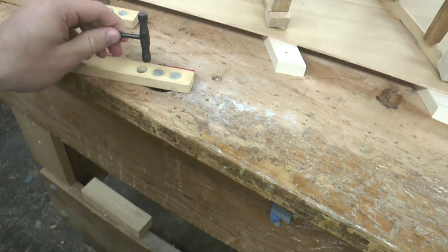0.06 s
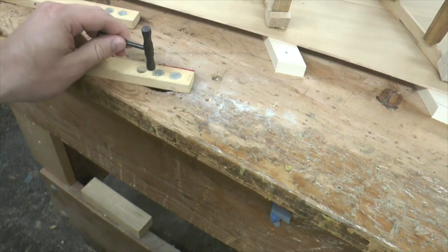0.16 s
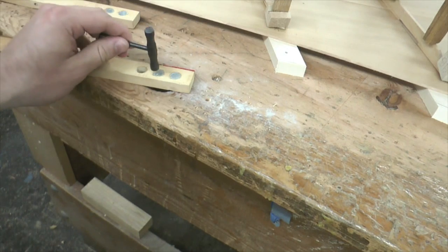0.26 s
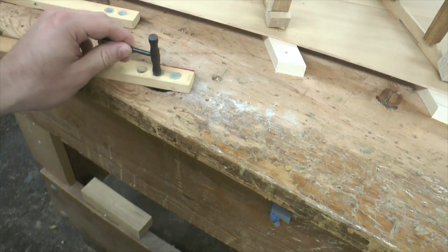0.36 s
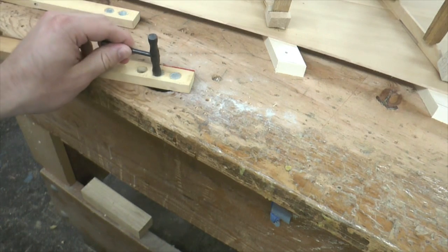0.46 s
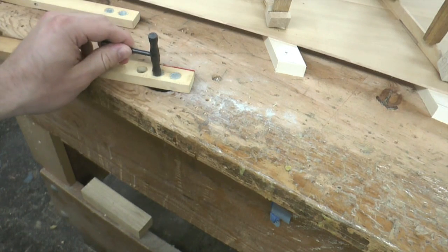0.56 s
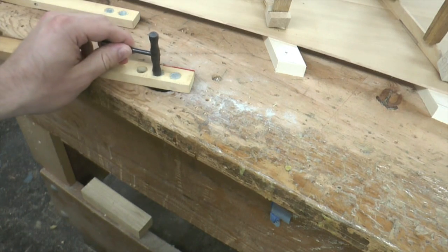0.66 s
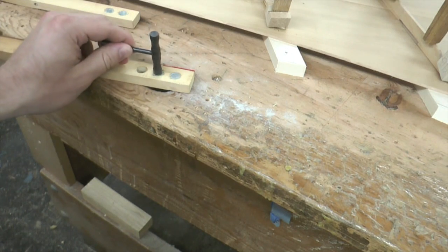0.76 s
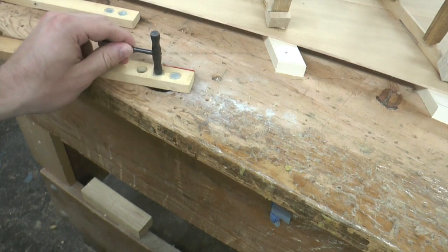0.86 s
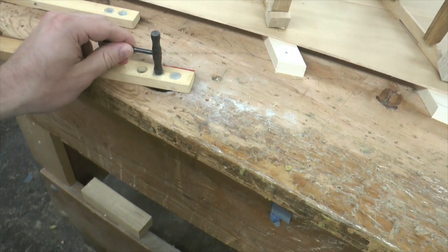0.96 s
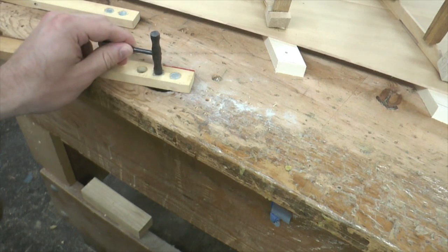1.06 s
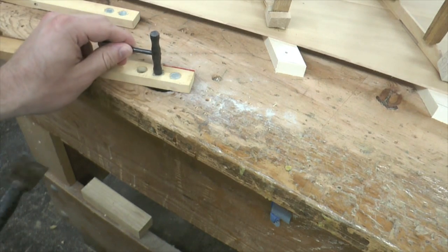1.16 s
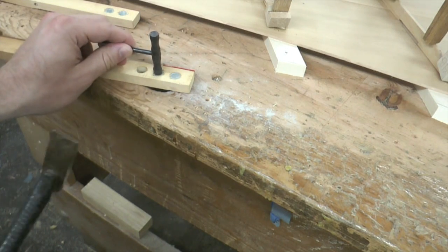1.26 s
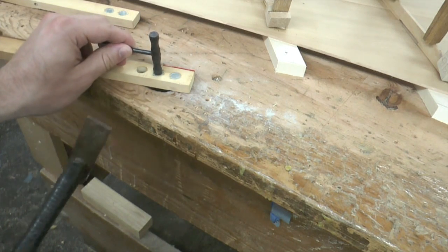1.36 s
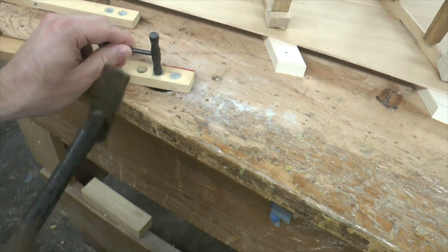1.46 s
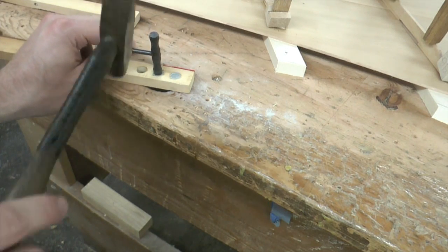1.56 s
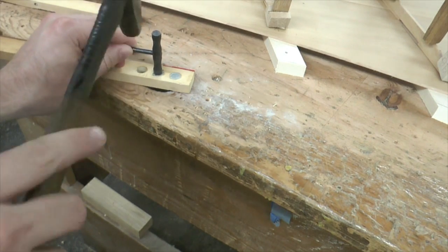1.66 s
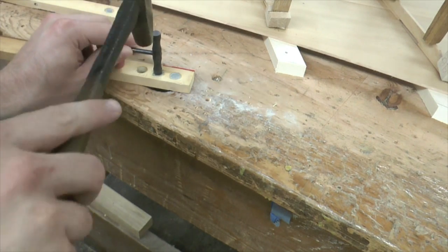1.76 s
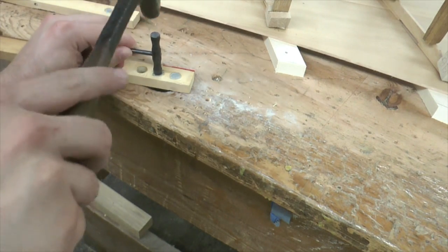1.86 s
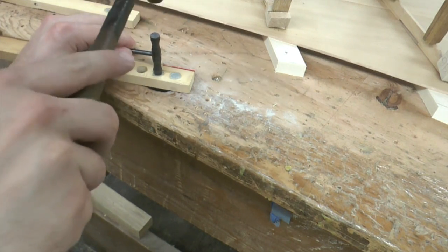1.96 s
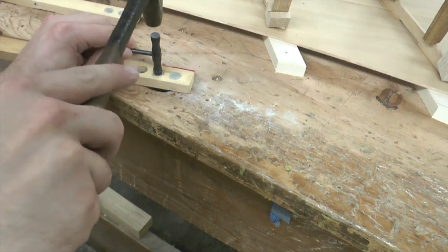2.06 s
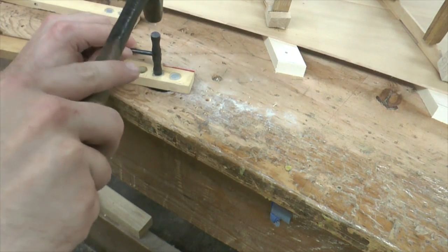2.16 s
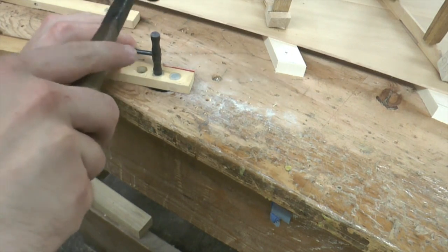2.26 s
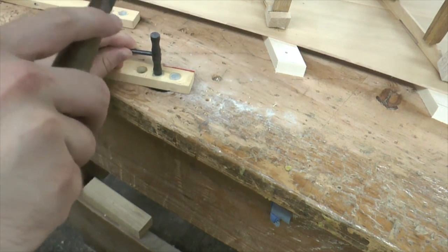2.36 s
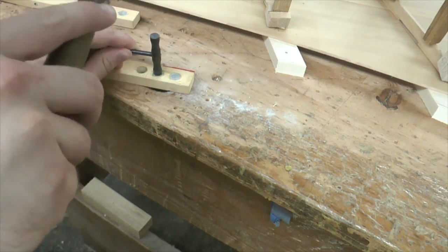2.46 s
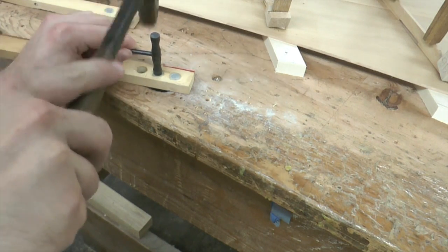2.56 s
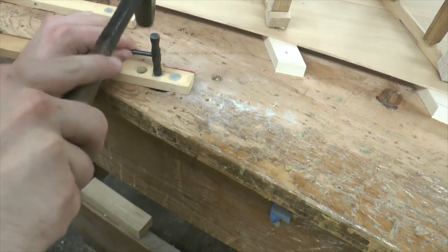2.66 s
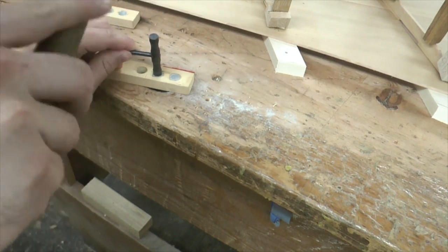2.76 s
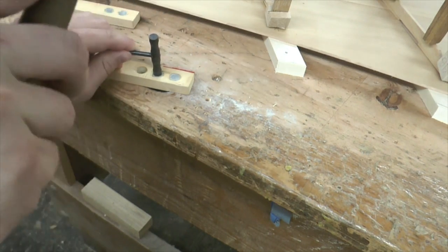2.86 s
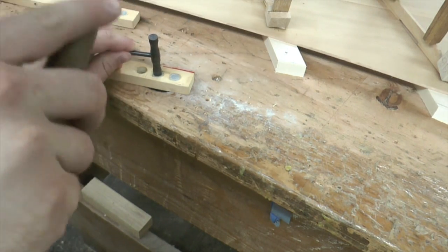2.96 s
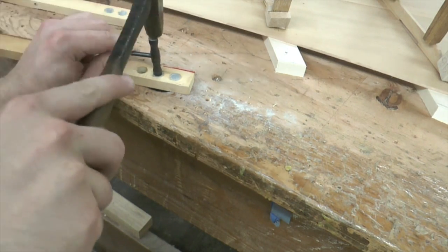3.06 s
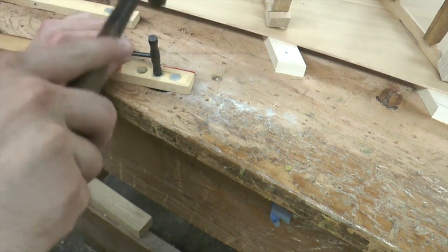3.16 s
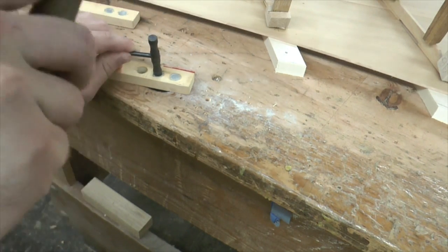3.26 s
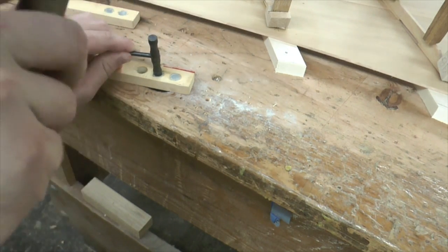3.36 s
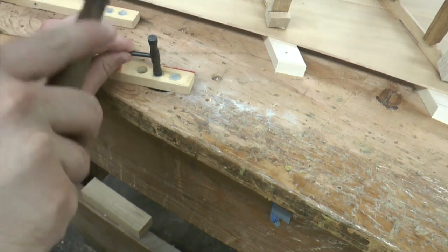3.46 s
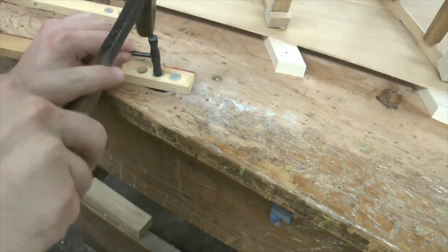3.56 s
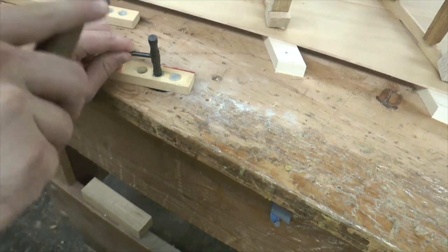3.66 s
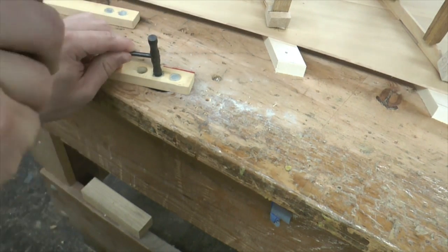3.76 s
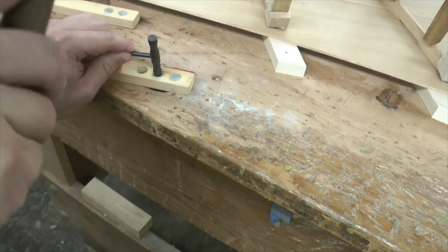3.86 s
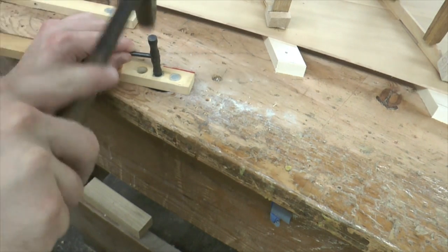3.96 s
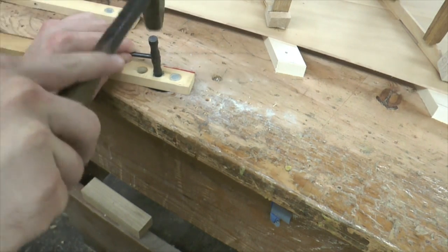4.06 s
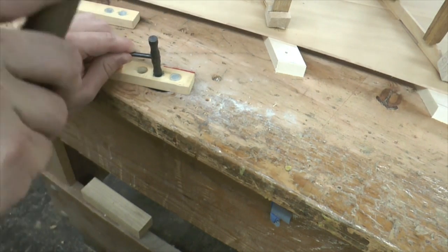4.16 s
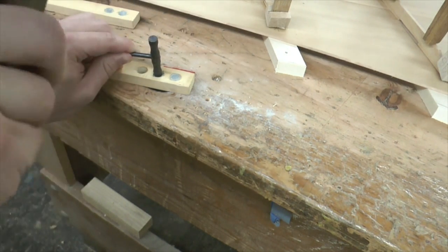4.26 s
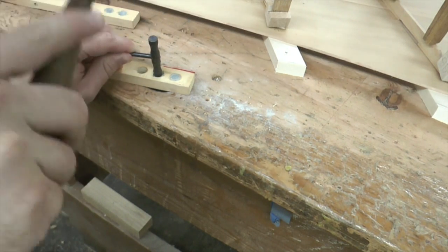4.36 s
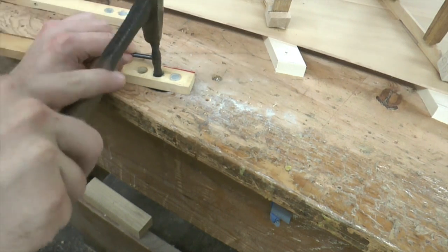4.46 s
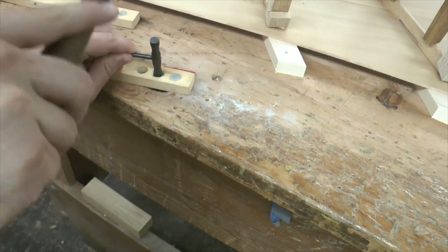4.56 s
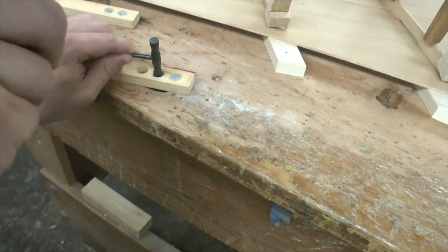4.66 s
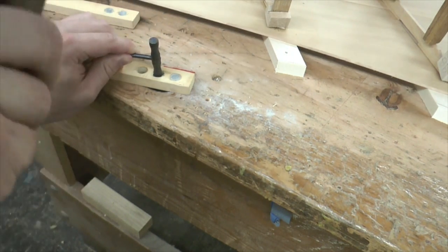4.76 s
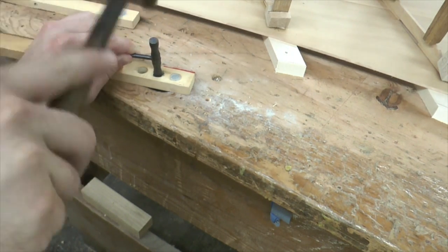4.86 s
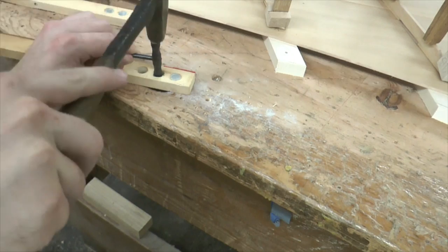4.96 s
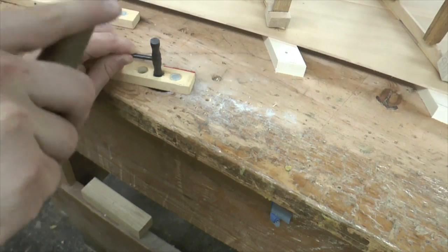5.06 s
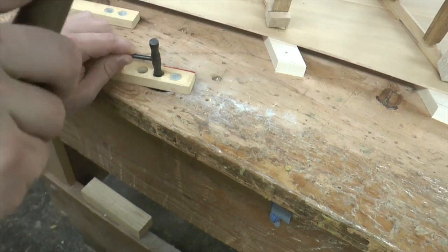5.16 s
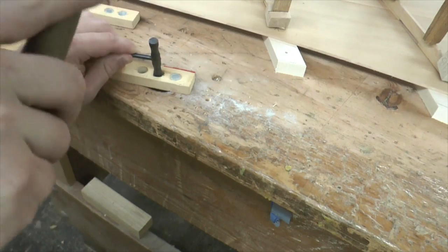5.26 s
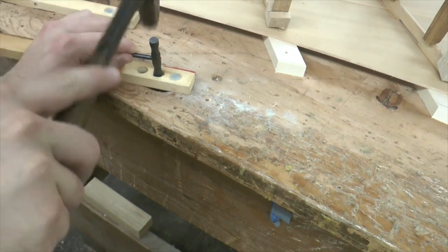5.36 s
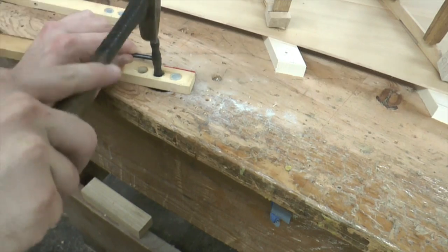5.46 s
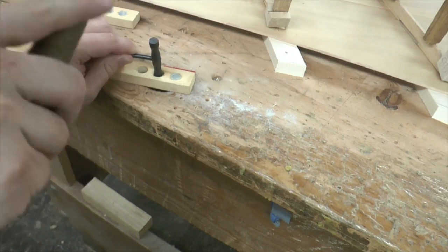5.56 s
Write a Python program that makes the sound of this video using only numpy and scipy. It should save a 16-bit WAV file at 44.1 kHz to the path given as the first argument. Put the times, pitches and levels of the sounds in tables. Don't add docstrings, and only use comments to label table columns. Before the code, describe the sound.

Faint handling ticks and soft thuds, then seven loud, evenly spaced hammer blows on a metal punch ring out in a live workshop.

```python
import sys
import numpy as np
from scipy import signal
from scipy.fft import rfft, irfft
from scipy.io import wavfile
from scipy.ndimage import uniform_filter1d

SR = 44100
rng = np.random.default_rng(int(sys.argv[2]) if len(sys.argv) > 2 else 0)


def digitize_waveform(pressure):
    field = np.atleast_2d(pressure).T
    bounded = np.clip(field, -1, 1)
    quanta = np.round(bounded * 32767).astype(np.int16)
    wavfile.write(sys.argv[1], SR, quanta)


def to_linear_factor(level_db):
    exponent = np.asarray(level_db, float) / 20
    return 10 ** exponent


N = 247842

# pitch_hz, level_db, t60_s
STEEL_MODES = [(2457, -6.5, 0.0046), (3524, -6, 0.0054), (4550, -11.5, 0.0052), (5360, -9, 0.0075),
               (6162, 2, 0.0033), (7966, 0.5, 0.0033), (8240, -3.5, 0.0055), (10150, -13, 0.0011),
               (9580, -25.5, .005)]
# pitch_hz, level_db, t60_s
SIZZLE_MODES = [(12800, -16.5, .004), (15470, -19, .004)]
# pitch_hz, level_db, t60_s
KEY_MODES = [(852, -3.5, 0.017), (1147, 1, 0.022), (1321, -1, 0.024), (1565, -8, 0.017), (1828, -6, 0.023),
             (2026, -12.5, 0.045), (2805, -10, 0.016)]
# pitch_hz, level_db, t60_s
BENCH_MODES = [(190, -11.5, 0.077), (256, -12.5, 0.08), (310.3, -6.5, 0.063), (349, -7, 0.043),
               (368, -10.5, 0.031), (410.6, -2, 0.13), (590, -11, 0.12), (612.6, -19, 0.073),
               (755, -10.5, 0.066)]
# pitch_hz, left_over_right_db
BENCH_SIDE = [(60, 15), (130, 20.5), (290, 6), (640, 7.5), (1410, 7.0), (3100, 8.5), (6820, 7), (15000, 6)]

SCATTER_DB = 1.5
FIRM_BOOM_DB = -10.5
KEY_GAIN = 0.4


def evened(x):
    return x / np.sqrt(np.mean(x ** 2) + 1e-20)


def read(points, hz):
    f, value = np.transpose(points)
    return np.interp(np.log(hz + 1), np.log(f + 1), value)


def add(mix, s, sound):
    part = mix[..., round(s * SR):][..., :sound.shape[-1]]
    part += sound[..., :part.shape[-1]]


def between(glancing, full, square):
    return glancing + (full - glancing) * square


def ports(a, b, same, side, lead=((1, 0),)):
    hz = np.fft.rfftfreq(len(a), 1 / SR)
    likeness = np.clip(read(same, hz), 0, 1)
    lean = to_linear_factor(read(side, hz) / 2)
    left, other = rfft(a), rfft(b)
    right = likeness * left + np.sqrt(1 - likeness ** 2) * other
    right = right * np.exp(-1j * read(lead, hz))
    return irfft([left * lean, right / lean], len(a))


def coloured(tone, count):
    gain = to_linear_factor(read(tone, np.fft.rfftfreq(count, 1 / SR)))
    return evened(irfft(rfft(rng.standard_normal(count)) * gain, count))


def ring(modes, rise, pitch=1, scatter_db=0, lasting=1, count=SR // 4):
    t = np.arange(count) / SR
    hz, db, t60 = np.transpose(modes)[:, :, None]
    luck = rng.standard_normal((2, len(modes), 1))
    decay = to_linear_factor(db + scatter_db * luck[0] - 60 * t / (t60 * lasting))
    waves = decay * np.sin(2 * np.pi * hz * pitch * t + 0.3 * scatter_db * luck[1])
    return waves.sum(0) * (1 - np.exp(-t / rise))


def slackened(modes, loss, bench_db):
    lost_db = loss * (FIRM_BOOM_DB - bench_db)
    return [(hz, db - lost_db * (320 < hz < 625), t60) for hz, db, t60 in modes]


def lamp_buzz():
    # pitch_hz, level_db
    harmonics = [(59.2, -79), (376.8, -84), (721.4, -80.5), (839.8, -79.5), (958.2, -69.5), (1082, -82.5),
                 (1680, -84.5), (1922, -86), (2040, -87.5), (2159, -87.5), (2638, -93), (2762, -85.5),
                 (2880, -92.5), (2998, -86.5), (3117, -86), (3241, -85.5), (3601, -88.5), (4199, -91),
                 (4441, -89.5), (4678, -90)]
    t = np.arange(N) / SR
    waver = evened(uniform_filter1d(rng.standard_normal((len(harmonics), N // 512 + 2)), 14, axis=1))
    buzz = np.zeros(N)
    for (hz, db), drift in zip(harmonics, waver):
        wavering_db = 0.76 * np.interp(t, np.arange(len(drift)) * 512 / SR, drift)
        buzz += to_linear_factor(db + 1.5 + wavering_db) * np.sin(2 * np.pi * (hz * t + rng.random()))
    return buzz * to_linear_factor([[3.], [-3.]])


def rustling():
    # centre_s, level_db, half_length_s
    strokes = [(0.12, -71, .08), (0.317, -84, 0.21), (1.1, -80, 0.063), (1.274, -77, 0.071),
               (1.791, -65.5, 0.035), (2.004, -69, .09), (2.652, -80, 0.041)]
    # pitch_hz, density_db
    cloth_tone = [(100, -17), (400, -1.5), (1000, -2.5), (2700, -12.5), (6000, -22), (12000, -31),
                  (16000, -30)]
    t = np.arange(N) / SR
    swell = to_linear_factor(-75.5)
    for s, db, half in strokes:
        swell = swell + to_linear_factor(db) * np.exp(-((t - s) / half) ** 2)
    grain = to_linear_factor(2.78 * evened(uniform_filter1d(rng.standard_normal(N), 300)))
    return swell * grain * coloured(cloth_tone, N)


def background():
    # pitch_hz, density_db
    hiss_tone = [(15, -51), (25, -25), (68, -4.5), (232, -2), (368, -4), (651, -17), (878, -21),
                 (952, -12.5), (1280, -15), (3150, -13), (3810, -12.5), (4360, -16.5), (5420, -16),
                 (14000, -26), (16000, -30.5)]
    # pitch_hz, likeness
    hiss_same = [(60, 0.5), (180, 0.5), (550, 1), (1650, -1.8), (4970, -3.2), (15000, -4.8)]
    # pitch_hz, left_over_right_db
    hiss_side = [(60, 5.7), (180, 13), (550, 5.7), (1650, 6.9), (4970, 11.2), (15000, 14)]
    hiss = to_linear_factor(-75) * coloured(hiss_tone, N)
    other_hiss = to_linear_factor(-69) * coloured(hiss_tone, N)
    return ports(hiss + rustling(), other_hiss, hiss_same, hiss_side) + lamp_buzz()


def workshop(x):
    # pitch_hz, t60_s
    room_t60 = [(60, 2.1), (160, 1.16), (420, 0.74), (1100, 0.93), (2000, 1.01), (3300, 0.88), (6000, 0.77),
                (9000, 0.65), (12000, 0.36), (16000, 0.23)]
    # pitch_hz, level_db
    room_tone = [(50, -21), (100, -8), (170, 0.4), (300, 9), (620, 8), (1100, 0), (2000, 4.5), (2400, -3.5),
                 (3300, -3), (4200, -5), (6000, -18.5), (9000, -13), (12000, -12), (16000, -10.5)]
    # pitch_hz, likeness
    room_same = [(60, 0.33), (150, 0.96), (380, 1), (950, 1), (2380, 0.98), (5980, 0.21), (15000, 1)]
    count = 2 * SR
    taps = rng.choice([-1., 1.], (2, count)) * (rng.random((2, count)) < .08)
    hz, t, z = signal.stft(taps, SR, nperseg=256)
    z *= to_linear_factor(read(room_tone, hz)[:, None] - 60 * t / read(room_t60, hz)[:, None])
    reflections = signal.istft(z, SR, nperseg=256)[1][:, :count]
    tail = ports(*reflections, room_same, BENCH_SIDE)
    tail *= 1 - np.exp(-np.arange(count) / SR / 0.00077)
    return signal.fftconvolve(x[None], tail / np.linalg.norm(tail[0]), axes=1)[:, :N]


def nearby(x):
    # delay_s, level_db
    early = [(.0033, -7), (.0048, -15.5), (.0085, -13), (0.0154, -16.5)]
    # pitch_hz, lead_rad
    port_phase = [(100, 0), (3000, .3), (6000, .6), (9000, 1.1), (16000, 1.0)]
    direct = 64
    echoes = np.zeros(2048)
    for s, db in early:
        echoes[direct + round(s * SR)] = to_linear_factor(db)
    dull = signal.lfilter(*signal.butter(2, 2500, fs=SR), echoes)
    path = dull + signal.unit_impulse(2048, direct)
    pair = ports(path, path, [(1, 1)], BENCH_SIDE, port_phase)
    return signal.oaconvolve(x[None], pair, axes=1)[:, direct:N + direct]


def click(db, hz, t60, spread):
    t = np.arange(1500) / SR
    band = signal.butter(2, [hz / spread, min(hz * spread, SR / 2.2)], "bandpass", fs=SR)
    noise = rng.standard_normal(len(t)) * to_linear_factor(-60 * t / max(t60, .002))
    sound = signal.lfilter(*band, noise)
    return to_linear_factor(db) * sound / abs(sound).max()


def tick(db, hz, tip_db):
    wood = click(db + 1, hz, 0.021, 1.25)
    tip = click(db + tip_db + 4, hz * 2.18, 0.009, 1.4)
    return wood + tip


def thud(db, rub_db, top_hz, t60):
    t = np.arange(SR // 4) / SR
    dull = signal.butter(6, [130, top_hz], "bandpass", fs=SR, output="sos")
    rub = evened(signal.sosfilt(dull, rng.standard_normal(len(t))))
    rub = to_linear_factor(rub_db - 30 * t / t60) * rub * (1 - np.exp(-t / 0.0019))
    body = ring(BENCH_MODES, 0.0018, scatter_db=SCATTER_DB, lasting=t60 * 9)
    damping = 1 + (t / (0.4 * t60)) ** 6
    return to_linear_factor(db) * (rub + to_linear_factor(5.5) * body) / damping


def contacts():
    # start_s, level_db, wood_hz, tip_over_wood_db
    ticks = [(0.1743, -55.5, 1380, -18), (.198, -64.5, 3000, 18.5), (.205, -60, 3200, 11),
             (0.2996, -52.5, 2630, 3), (0.303, -65, 3500, 9.5), (.536, -57.5, 3160, -5),
             (1.264, -67, 2300, 2), (1.703, -59.5, 1230, -20), (1.765, -58, 2680, -11),
             (1.783, -63, 2700, -2), (1.997, -51.5, 3400, 9.5), (2.006, -55.5, 3300, 10),
             (2.0615, -44.5, 1382, -2), (2.064, -50, 2900, 2), (2.094, -55, 1590, -5),
             (2.168, -58, 3150, -12), (2.186, -69, 2860, 2), (2.438, -62.5, 3100, -8),
             (3.246, -30, 3350, -5.5)]
    # start_s, level_db, rub_db, rub_top_hz, t60_s
    thuds = [(0.541, -49, 2.5, 920, 0.14), (.595, -56.5, -3, 955, 0.16), (1.265, -69, 3, 494, 0.2),
             (1.769, -64.5, -3, 900, 0.049), (1.795, -69, 1.5, 900, .06), (2.063, -63, -10, 585, 0.06)]
    small = np.zeros((2, N))
    for s, *touch in thuds:
        add(small, s, thud(*touch) * to_linear_factor([[4.5], [-4.5]]))
    for s, *touch in ticks:
        add(small, s, tick(*touch) * to_linear_factor([[7.75], [-7.75]]))
    return small


def standing_waves():
    # pitch_hz, level_db, t60_s
    room_modes = [(87, -51, 2.3), (95, -55.5, 2.0), (118.4, -53.5, 2.4), (146.8, -44.5, 1.1)]
    return ring(room_modes, 0.02, scatter_db=0.5, count=2 * SR)


def lingering(bench_db):
    # pitch_hz, level_db, t60_s
    long_modes = [(241.3, -38, 0.78), (288.4, -32.5, 0.31), (347, -29.5, 0.83), (366.3, -35, 0.44),
                  (444, -33, 1), (460.3, -33.5, 0.89), (496.5, -30, 0.59), (555.3, -37, 0.82),
                  (601.7, -38, 0.95), (629.3, -30, 0.75), (715, -36, 1), (1990, -48.5, 0.52)]
    held = slackened(long_modes, 1.1, bench_db)
    return to_linear_factor(bench_db + 5) * ring(held, 0.018, scatter_db=SCATTER_DB, count=SR)


def humps(modes, pitch, blur):
    hz, db, _ = np.transpose(modes)[:, :, None]
    off = (np.fft.rfftfreq(2048, 1 / SR) - hz * pitch) / (blur * hz)
    return (to_linear_factor(db) ** 2 / (1 + off ** 2) ** 2).sum(0)


def radiated(db, bench_db, note_hz, square):
    pitch = between(0.94, 1.0115, square)
    lost_db = FIRM_BOOM_DB - bench_db
    note = [(note_hz, 0, 1), (8100, -8.5, 1)]
    parts = [
        (bench_db, humps(slackened(BENCH_MODES, 1.1, bench_db), 0.91, 0.25)),
        (db + between(-8, -5, square) + KEY_GAIN * lost_db, humps(KEY_MODES, pitch, 0.11)),
        (db + between(-3, -8.5, square) - 0.4 * lost_db, humps(STEEL_MODES[:5], pitch, 0.11)),
        (db + between(-26, 6.3, square), humps(note, 0.96, 0.085)),
        (db + between(-3.5, 1.5, square), humps(SIZZLE_MODES, 0.69, 0.2)),
    ]
    total = sum(to_linear_factor(part_db) ** 2 * shape for part_db, shape in parts)
    log_size = np.log(total + 1e-9) / 2
    folded = irfft(log_size) * np.r_[1, 2 * np.ones(1023), 1, np.zeros(1023)]
    return to_linear_factor(29) * irfft(np.exp(rfft(folded)))


def blow(db, bench_db, note_hz, square):
    pitch = between(0.94, 1.0115, square)
    note_db = between(-24.5, -5, square)
    t = np.arange(SR // 4) / SR
    steel = ring(STEEL_MODES, 0.00054, pitch, SCATTER_DB)
    steel += to_linear_factor(between(-3, -14, square)) * ring(SIZZLE_MODES, 0.0006, scatter_db=SCATTER_DB)
    steel += ring([(note_hz, note_db, .008), (note_hz * 0.82, note_db - 10, .008)], 0.00015)
    grit = to_linear_factor(-5.5 - 60 * t / 0.0064) * rng.standard_normal(len(t))
    key = to_linear_factor(KEY_GAIN * (FIRM_BOOM_DB - bench_db)) * ring(KEY_MODES, 0.00108, pitch, SCATTER_DB)
    bench = ring(slackened(BENCH_MODES, 2.2, bench_db), 0.0016, scatter_db=SCATTER_DB)
    struck = to_linear_factor(between(-3, -5.5, square) + 4.5) * (steel + grit)
    struck += to_linear_factor(between(-11.5, -6, square) - 7.5) * key
    return to_linear_factor(db + 12.5) * struck + to_linear_factor(bench_db - 5.5) * bench


def scene():
    # start_s, level_db, boom_db, note_hz, squareness (0 to 1)
    blows = [
        (2.731, -10.5, -11, 8910, 0.4),
        (3.211, -9.5, -10, 7600, 0.61),
        (3.669, -9, -11, 7640, 0.61),
        (4.13, -9, -12.5, 6470, 0.86),
        (4.567, -10.5, -14, 6100, 0.98),
        (5.043, -11.5, -13, 6040, 1),
        (5.536, -8.5, -13, 7270, 0.44),
    ]
    near, far, drone = np.zeros(N), np.zeros(N), np.zeros(N)
    flight = .0008
    for s, *hit in blows:
        add(near, s + flight, blow(*hit))
        add(far, s + flight, radiated(*hit))
        add(near, s, lingering(hit[1]))
        add(drone, s, standing_waves())
    small = contacts()
    room = workshop(far + to_linear_factor(-21.5) * small.mean(0))
    return nearby(near) + room + drone * to_linear_factor([[1.5], [-1.5]]) + small + background()


def low_pass(x):
    return signal.sosfilt(signal.butter(12, 16860, fs=SR, output="sos"), x)


def record(dry):
    ceiling = to_linear_factor(-9)
    held = dry / (1 + (dry / ceiling) ** 4) ** (1 / 4)
    overload = uniform_filter1d(1. * (abs(dry[0]) > ceiling), 221, origin=110) > 0
    sag = signal.lfilter([1], [1, -np.exp(-1 / (0.048 * SR))], overload)
    sag = signal.lfilter(*signal.butter(1, .9, "highpass", fs=SR), sag)
    out = held - to_linear_factor(-79.0) * sag
    out = signal.oaconvolve(out, signal.firwin(255, 16250, fs=SR)[None], "same")
    return low_pass(out)


dry = scene()
out = record(dry)
digitize_waveform(out)
```